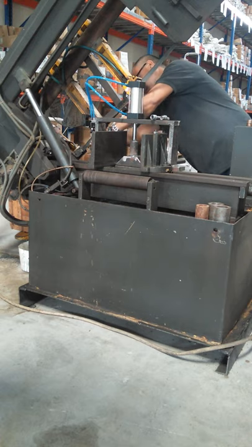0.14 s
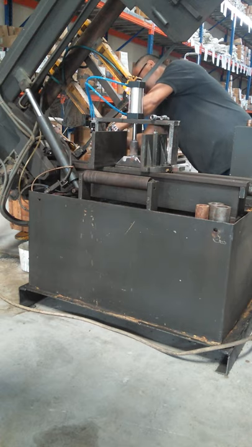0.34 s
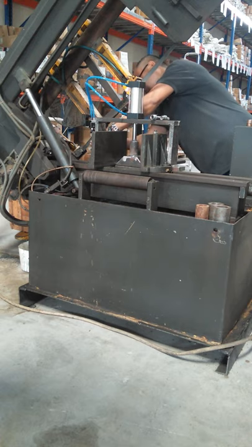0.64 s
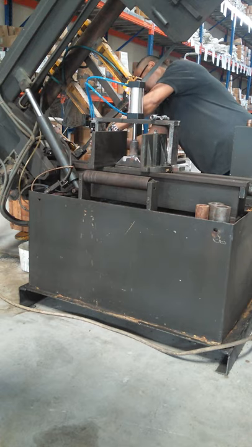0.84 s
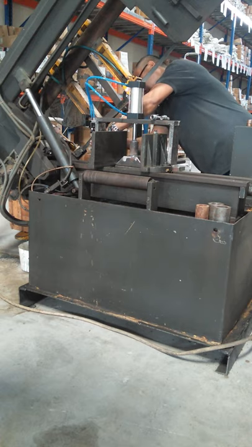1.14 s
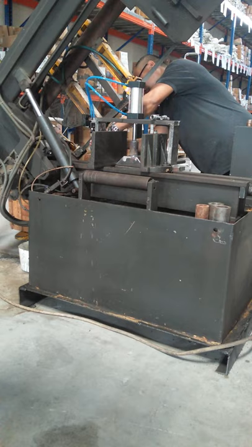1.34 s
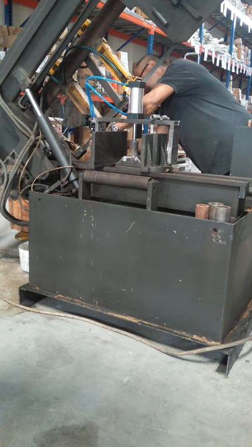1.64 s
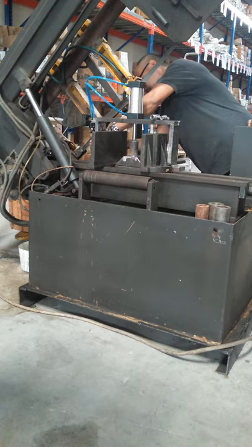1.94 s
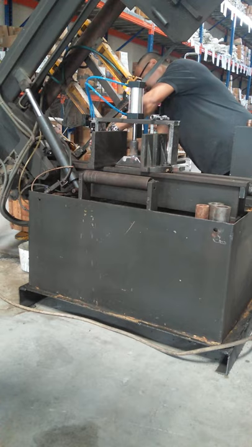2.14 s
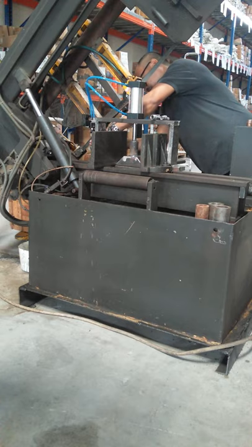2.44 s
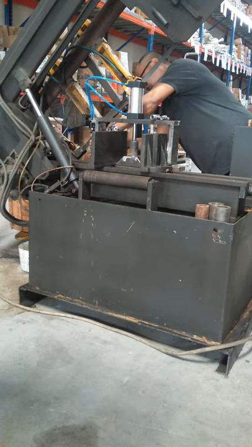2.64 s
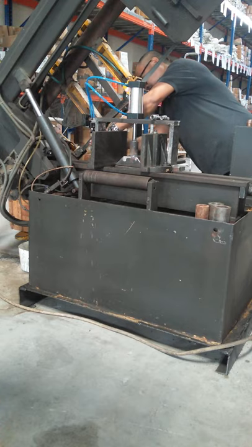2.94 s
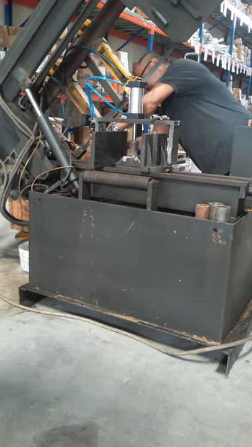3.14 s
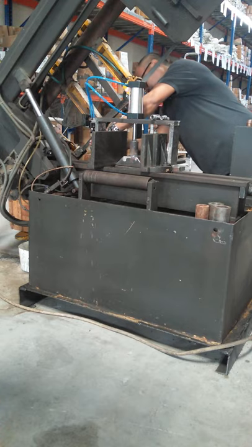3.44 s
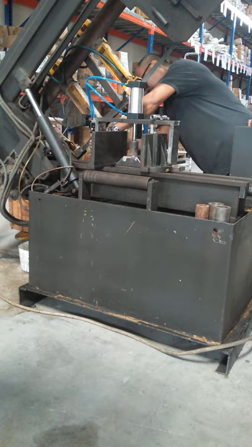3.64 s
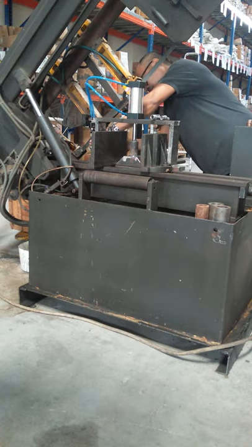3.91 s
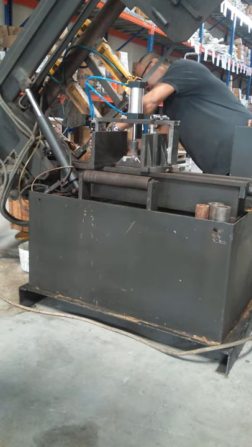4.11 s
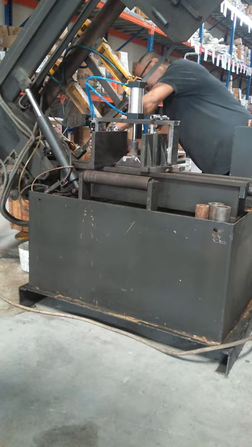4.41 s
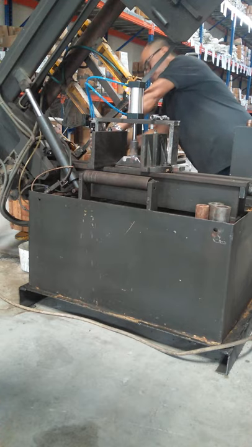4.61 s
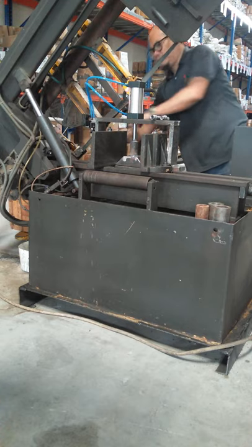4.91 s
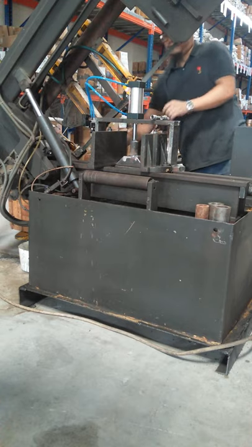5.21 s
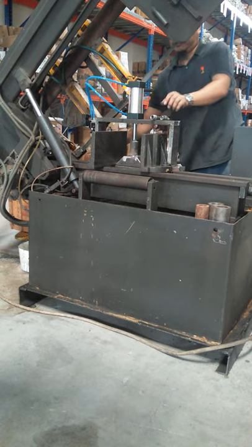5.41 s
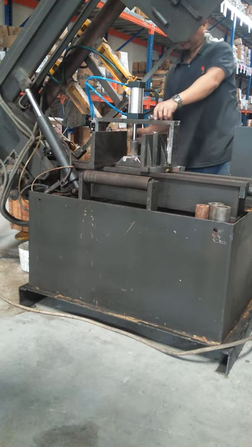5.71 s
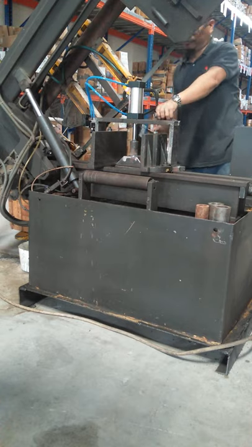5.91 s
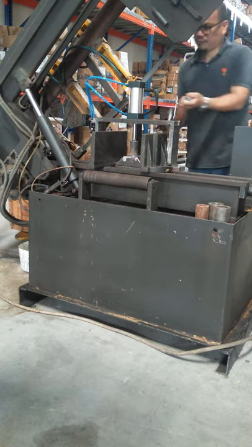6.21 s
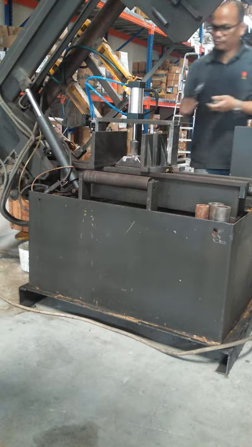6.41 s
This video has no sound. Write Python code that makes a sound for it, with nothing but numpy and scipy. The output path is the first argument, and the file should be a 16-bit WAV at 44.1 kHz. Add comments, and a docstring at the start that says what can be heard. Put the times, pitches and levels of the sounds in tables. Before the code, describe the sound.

In a big reverberant workshop, a threaded part squeaks under short hand strokes, a pneumatic cylinder vents a sharp fading hiss, then steel clinks.

```python
"""In a large workshop hall, a steel machine's pneumatic cylinder vents: shaped noise follows the falling
pressure. Its frame groans and thuds briefly: a wavering sine and bursts of low noise. A threaded part is turned
by hand in short strokes: noise scrapes and ticks, and a gliding tone squeaks. Loose steel clinks as blurred
decaying modes, and a second contact on the thread squeals drily on single lower notes. Behind lie a dying
distant bang, murmur, swells of far work and faint motor hum: decaying or steady noise and sines."""
import sys
import numpy as np
from scipy import signal
from scipy.fft import rfft, irfft, next_fast_len
from scipy.io import wavfile
from scipy.ndimage import map_coordinates

SR = 44100
rng = np.random.default_rng(int(sys.argv[2]) if len(sys.argv) > 2 else 0)


def unload_wav(signal):
    """Save mono or channel-first audio to the path in sys.argv[1] as 16-bit WAV at rate SR, clipped to [-1, 1]."""
    wavfile.write(
        sys.argv[1],
        SR,
        np.round(np.clip(np.atleast_2d(signal).T, -1, 1) * 32767).astype(np.int16),
    )


N = 288940  # samples


def amp(db):
    """Level to amplitude: 20 dB is a factor of ten."""
    return 10 ** (np.asarray(db) / 20)


def unit(x):
    """Normalisation to a root-mean-square value of 1."""
    return x / np.sqrt(np.mean(x ** 2) + 1e-20)


def along(points, hz):
    """Interpolation of (frequency_hz, value) points on a logarithmic frequency axis."""
    frequency, value = np.transpose(points)
    return np.interp(np.log(hz + 1), np.log(frequency), value)


def wobble(rate, size=N):
    """Slow random modulation: a smooth curve through normal random knots, rate knots a second."""
    knots = rng.standard_normal(int(size * rate / SR) + 4)
    return map_coordinates(knots, [np.arange(size) * rate / SR])


def filtered(x, response):
    """Linear filtering: the spectrum of x times a response given as a function of frequency."""
    m = next_fast_len(x.shape[-1] + SR // 4)  # zero padding limits wrap-around
    spectrum = rfft(x, m) * response(np.fft.rfftfreq(m, 1 / SR))
    return irfft(spectrum, m)[..., :x.shape[-1]]


# Coherence of the diffuse field: frequency_hz, left_right_likeness (0 to 1)
LIKENESS = [(100, 0.89), (250, 0.85), (500, 0.84), (1000, 0.14), (2000, 0)]


def spread(pair):
    """Diffuse-field coherence: two unrelated signals become alike in the bass, unrelated above."""
    def mid_side_gains(hz):
        angle = np.arccos(np.clip(along(LIKENESS, hz), -1, 1)) / 2
        return np.array([np.cos(angle), np.sin(angle)])

    mid, side = filtered(pair, mid_side_gains)
    return np.array([mid + side, mid - side])


def noise(spectrum, peaks=()):
    """Resonant filtering of random noise: stereo, rms 1, peaks standing on a broad spectrum."""
    def response(hz):
        lift = 1 + sum(amp(db) / (1 + (2 * (hz - centre) / width) ** 2) for centre, width, db in peaks)
        return amp(along(spectrum, hz)) * lift

    return unit(filtered(spread(rng.standard_normal((2, N))), response))


def decay(t, t60):
    """Exponential damping: the level falls 60 dB in t60 seconds."""
    return np.exp(-np.log(1000) * t / t60)


def gate(start, end, attack, t60):
    """Attack, hold and release: a linear rise from start, a hold until end, then exponential decay."""
    t = np.arange(N) / SR
    return np.clip((t - start) / attack, 0, 1) * decay(np.maximum(t - end, 0), t60)


def add(track, s, sound):
    """Superposition: a sound is summed into a track from time s."""
    part = track[..., round(s * SR):][..., :sound.shape[-1]]
    part += sound[..., :part.shape[-1]]


def die_away(x, t60s):
    """Frequency-dependent damping: every band of x decays at its own rate."""
    hz, t, bands = signal.stft(x, SR, nperseg=256)
    damped = bands * decay(t, along(t60s, hz)[:, None])
    return signal.istft(damped, SR, nperseg=256)[1][:, :x.shape[-1]]


# Faint steady hiss, spectral shape: frequency_hz, relative_level_db (per Hz)
HISS = [(300, -38), (1500, -6), (3000, -6), (6000, -14.5), (10000, -12), (15500, -10.5)]


def hiss(level_db=-63):
    """Stationary noise: a faint hiss of constant level lies on both sides."""
    return amp(level_db) * noise(HISS)


# Hall murmur, spectral shape: frequency_hz, relative_level_db (per Hz)
MURMUR_SPECTRUM = [(15, -60), (25, -26), (75, -2.5), (161, -4), (195, -7), (398, -11.5), (516, -10),
                   (731, -18.5), (840, -14.5), (983, -23), (1600, -20.5), (2080, -51), (3520, -120)]


def murmur(level_db=-54.0):
    """Stationary noise: broad low-pitched sound fills the hall with slight unsteadiness of level."""
    return amp(level_db + 1.1 * wobble(5)) * noise(MURMUR_SPECTRUM)


# Motor tones: pitch_hz (centre), relative_level_db (centre, before hum's offset)
MOTORS = [(75.4, -67.5), (344.5, -66.5), (716, -67), (1432, -73.5)]


def hum(offset_db=-1):
    """Periodic vibration: each motor sounds one sine of slightly wandering pitch and level."""
    total = 0
    for hz, db in MOTORS:
        level = amp(db + wobble(3.55))
        phase = 2 * np.pi * np.cumsum(hz + wobble(6)) / SR
        total = total + level * unit(np.sin(phase))
    return amp(offset_db) * total


# Swells of far work: peak_s, level_db
FAR_SWELLS = [(0, -42), (1.25, -56), (2.95, -50.5), (3.65, -51), (4.3, -48.5), (4.53, -48.5), (5.15, -51),
              (5.72, -47)]
# Far work, spectral shape: frequency_hz, relative_level_db (per Hz)
FAR_SPECTRUM = [(100, -11), (350, 0.5), (650, -2), (1000, -3), (1500, -7.5), (2500, -14), (5000, -23.5)]
# Far work, resonances: frequency_hz, width_hz, relative_level_db
FAR_RESONANCES = [(386, 81, -6.5), (857, 31, 1), (1010, 67, 2)]


def far_work(rise_s=0.15, t60=2.74):
    """Reverberant build-up and decay: each swell grows exponentially, then fades in the hall."""
    t = np.arange(N) / SR
    swells = []
    for peak_s, db in FAR_SWELLS:
        build_up = np.exp(np.minimum(t - peak_s, 0) / rise_s)
        swells.append(amp(db) * build_up * decay(np.maximum(t - peak_s, 0), t60))
    # unrelated swells sum in energy
    return np.linalg.norm(swells, axis=0) * noise(FAR_SPECTRUM, FAR_RESONANCES)


# Distant bang, spectral shape: frequency_hz, relative_level_db (per Hz)
BANG_SPECTRUM = [(40, -25), (80, -17), (160, -10), (300, -13.5), (500, -8), (750, -5), (1000, -8),
                 (1400, -8.5), (2100, -15.5), (4500, -21), (9000, -26), (15000, -45)]
# Distant bang, resonances: frequency_hz, width_hz, relative_level_db
BANG_RESONANCES = [(777, 27, 7.5), (1262, 43, 10), (1680, 27, 2), (2177, 33, 7)]
# Reverberation of the hall, also used by room(): frequency_hz, t60_s
HALL_T60 = [(100, 4.75), (1000, 2.1), (4000, 2.5), (7600, 1.31), (11000, 0.83), (16000, 0.4)]


def distant_bang(level_db=-33):
    """Reverberant decay: only the hall's ringing tail is left of a bang far away."""
    return amp(level_db) * die_away(noise(BANG_SPECTRUM, BANG_RESONANCES), HALL_T60)


def room(x, near_db=-5, near_t60=0.39, hall_db=-6):
    """Reverberation by convolution: nearby steel surfaces answer quickly, the big hall slowly."""
    near = die_away(rng.standard_normal((2, 2 * SR)), [(1000, near_t60)])
    hall = die_away(rng.standard_normal((2, 2 * SR)), HALL_T60)
    near = amp(near_db) * near / np.linalg.norm(near[0])
    hall = amp(hall_db) * hall / np.linalg.norm(hall[0])
    delayed = np.pad(spread(near + hall), ((0, 0), (SR // 200, 0)))  # begins 5 ms after the direct sound
    return x + signal.fftconvolve(x, delayed, axes=1)[:, :N]


# Dull pushes on the frame: start_s, level_db, t60_s
PUSHES = [(1.53, -38.5, 0.2), (1.95, -47.5, 0.65), (5.431, -62, .25)]
# Frame thud, spectral shape: frequency_hz, relative_level_db (per Hz)
FRAME_SPECTRUM = [(30, -17), (55, 2.5), (110, -1), (250, -9), (500, -40), (1500, -80)]


def jolts():
    """Impulsive excitation of a heavy body: the frame thuds in low noise when loaded or struck."""
    push, t = np.zeros(N), np.arange(SR // 2) / SR
    for s, db, t60 in PUSHES:
        add(push, s, amp(db) * np.minimum(t / 0.0046, 1) * decay(t, t60))
    return push * noise(FRAME_SPECTRUM)


# The frame under load: start_s, length_s, level_db (sine amplitude, before random variation)
FRAME_LOADS = [(1.878, 0.12, -38), (2.138, 0.063, -46.5)]


def groan(pitch_hz=162, waver_hz=4, attack=0.034, t60=0.27):
    """Forced vibration: the moving piston sets the frame humming unevenly on one wavering sine."""
    load = sum(amp(db) * gate(s, s + length, attack, t60) for s, length, db in FRAME_LOADS)
    unevenness = amp(1.5 * wobble(24.1))
    phase = 2 * np.pi * np.cumsum(pitch_hz + waver_hz * wobble(29.8)) / SR
    return load * unevenness * np.sin(phase)


# A second contact on the thread squeals drily at a lower note: start_s, pitch_hz (centre), level_db, t60_s
SECOND_CONTACT_SQUEALS = [(1.075, 4920, -67.5, 0.87), (5.708, 4680, -33.5, 0.13), (5.786, 4680, -43.5, 0.35),
                          (6.217, 4680, -55, 0.42)]


def pings(waver_hz=35):
    """Stick-slip at a second contact: each squeal rings briefly on one buzzing, damped note."""
    ring, t = np.zeros(N), np.arange(SR // 2) / SR
    for s, hz, db, t60 in SECOND_CONTACT_SQUEALS:
        pitch = hz + waver_hz * wobble(425, size=len(t))
        note = np.sin(2 * np.pi * np.cumsum(pitch) / SR)
        add(ring, s, amp(db) * np.minimum(t / 0.0022, 1) * decay(t, t60) * note)
    return ring


# Steel on steel: start_s, level_db (of the chatter), clatter_t60_s
CONTACTS = [(5.048, -34.5, 0.068), (5.429, -31.5, 0.077), (5.435, -26.5, 0.039), (5.443, -52, 0.035),
            (5.68, -46, 0.2)]
# Modes of the loose steel: pitch_hz (centre), relative_level_db (mean), t60_s
STEEL_MODES = [(1350, -21, 0.61), (2110, -16, 0.16), (2600, -30, 0.09), (3020, -13.5, 0.19),
               (4200, -29, 0.16), (4560, -24, 0.15), (5060, -11.5, 0.2), (5660, -24, 0.13),
               (7230, -6.5, 0.087), (7980, -1.5, 0.13), (11600, -7.5, 0.068)]
# Contact chatter, spectral shape: frequency_hz, relative_level_db (per Hz)
CLATTER_SPECTRUM = [(150, 3.5), (700, -2), (1400, -3.5), (2400, 5), (3500, -5), (4800, 6.5), (6500, -6.5),
                    (9000, -10), (12000, -11), (16000, -42.5)]


def clinks(ring_db=-2.5, attack=0.00071, rattle=0.014):
    """Modal synthesis: loose steel chatters and rings on; the rattling contact blurs its modes."""
    ring, chatter, t = np.zeros(N), np.zeros(N), np.arange(SR // 4) / SR
    rise = 1 - np.exp(-t / attack)
    for s, db, clatter_t60 in CONTACTS:
        for hz, mode_db, t60 in STEEL_MODES:
            pitch = hz * (1 + rattle * wobble(470, size=len(t)))
            cycles = rng.random() + np.cumsum(pitch) / SR
            level = amp(db + ring_db + mode_db + rng.standard_normal())  # modes vary from hit to hit
            add(ring, s, level * rise * decay(t, t60) * np.sin(2 * np.pi * cycles))
        add(chatter, s, amp(db) * rise * decay(t, clatter_t60))
    return ring + chatter * noise(CLATTER_SPECTRUM)


# The thread catching: start_s, relative_level_db (before the offset in ticks)
CATCHES = [(0.7334, -40.5), (3.472, -34), (3.5054, -36.5), (3.95, -38), (4.2532, -49), (4.2898, -34),
           (4.785, -32), (5.188, -30), (5.227, -30.5), (5.392, -37.5), (6.0122, -34), (6.0467, -30)]
# Rubbing thread, spectral shape, also used by squeaks(): frequency_hz, relative_level_db (per Hz)
SCRAPE_SPECTRUM = [(1000, -8.5), (2500, -9), (4500, -2), (6400, -7.5), (7800, 10.5), (9500, -2.5),
                   (12500, -5), (16000, -9.5)]


def ticks(offset_db=4, t60=0.019):
    """Sudden release: the thread catches with tiny dry snaps of fast-decaying noise."""
    snaps, t = np.zeros(N), np.arange(SR // 8) / SR
    for s, db in CATCHES:
        add(snaps, s, amp(db + offset_db) * np.minimum(t / 0.00099, 1) * decay(t, t60))
    return snaps * noise(SCRAPE_SPECTRUM)


# Strokes of the thread, levels before fade and decay:
# start_s, length_s, squeal_lock_s, squeal_pitch_hz (mid-stroke), squeal_level_db, scrape_level_db
STROKES = [(0.074, 0.13, .02, 7700, -69, -48.5), (0.299, 0.15, 0.016, 7660, -37.5, -44.5),
           (0.458, 0.092, 0.036, 7653, -35, -50), (0.732, .07, 0.0032, 7660, -40, -59.5),
           (1.138, 0.067, 0.0027, 7550, -50.5, -63.5), (1.459, 0.1, 0.019, 7690, -42, -41),
           (2.585, .13, 0.019, 7705, -34, -43.5), (2.68, 0.12, 0.0064, 7477, -36.5, -54),
           (3.448, 0.051, .02, 7580, -38.5, -48.5), (3.511, 0.041, 0.0035, 7620, -29.5, -45.5),
           (3.579, 0.04, 0.0046, 7510, -35.5, -51), (3.934, 0.094, 0.028, 7660, -44.5, -48.5),
           (4.236, 0.12, 0.021, 7630, -36, -43), (4.418, 0.162, 0.012, 7590, -42, -52.5),
           (4.774, .11, 0.014, 7606, -41.5, -47), (5.18, 0.177, 0.02, 7680, -31, -42.5),
           (5.779, 0.05, 0.013, 7660, -46.5, -81), (6.018, .15, 0.013, 7650, -41, -45)]
# Partials of the squeal: ratio to its pitch, relative_level_db
SQUEAL_PARTIALS = [(.489, -24.5), (1, 5.5), (1.519, -29)]


def squeaks(waver_hz=22, flutter_db=3.5, edge=0.0055, glide_hz=40, fade_db_per_s=17, scrape_t60=0.77):
    """Stick-slip friction: each stroke scrapes as it breaks loose and locks onto one unsteady high note."""
    squeal, rubbing = np.zeros(N), np.zeros(N)
    t = np.arange(SR // 3) / SR
    for s, length, lock, hz, db, scrape_db in STROKES:
        grip = np.clip(t / 0.0025, 0, 1) * np.clip((length - t) / edge + .5, 0, 1)
        # the note sags a little as the stroke slows
        pitch = hz + glide_hz * (.5 - t / length) + waver_hz * wobble(227, size=len(t))
        phase = 2 * np.pi * np.cumsum(pitch) / SR
        flutter = amp(flutter_db * wobble(103.4, size=len(t)))
        tone = unit(sum(amp(d) * np.sin(ratio * phase) for ratio, d in SQUEAL_PARTIALS) * flutter)
        # the squeal locks on, then fades as the hand slows
        level = amp(db - fade_db_per_s * t) * np.minimum(t / lock, 1) ** 2
        add(squeal, s, level * grip * tone)
        add(rubbing, s, amp(scrape_db) * grip * decay(t, scrape_t60))
    roughness = unit(amp(1.8 * wobble(300)))
    return squeal + rubbing * roughness * noise(SCRAPE_SPECTRUM)


# Exhaust jet, spectral shape: frequency_hz, relative_level_db (per Hz)
JET_SPECTRUM = [(35, -31), (60, -10), (124, -26), (160, -18), (198, -16), (294, -11), (354, -8), (527, -8),
                (636, -4), (2650, -2), (4640, 1.5), (6430, -0.5), (8320, 0), (14900, -8), (16000, -12)]
# Resonances of the exhaust port: frequency_hz, width_hz, relative_level_db
PORT_RESONANCES = [(1350, 860, -7), (3400, 660, -16), (5000, 440, -14), (8420, 1000, -3)]
# Surges that ring the exhaust port: start_s, level_db (before flicker)
PORT_SURGES = [(1.53, -20.5), (1.664, -26)]
# Surges, spectral shape: frequency_hz, relative_level_db (per Hz)
SURGE_SPECTRUM = [(300, -25.5), (1000, -13), (2500, -13), (4000, 2.5), (5300, 0), (6500, -5), (8300, -2.5),
                  (15000, -11)]
CRACK_S, OPEN_S, SHUT_S = 1.506, 1.531, 2.15  # the valve cracks, opens fully and shuts
# flow at first, and once the pressure has fallen to that of the supply; time constant of the fall
BURST_DB, SUPPLY_DB, DRAIN_S = -20.5, -28.5, 0.31


def exhaust(split_hz=900, rumble_give=0.63, attack=0.0023, shut_t60=0.49,
            surge_s=0.048, surge_t60=0.19, puff_db=-36, puff_hz=1800):
    """Turbulent jet noise: a dull puff, then the full jet, whose hiss weakens faster than its rumble."""
    jet = noise(JET_SPECTRUM, PORT_RESONANCES)
    age = np.maximum(np.arange(N) / SR - OPEN_S, 0)
    flow = amp(SUPPLY_DB) + (amp(BURST_DB) - amp(SUPPLY_DB)) * np.exp(-age / DRAIN_S)

    def below(corner):
        return filtered(jet, lambda hz: 1 / (1 + (hz / corner) ** 4))

    rumble = below(split_hz)
    middle = amp((BURST_DB + SUPPLY_DB) / 2)
    rumble_flow = middle * (flow / middle) ** rumble_give  # a power below 1 softens the fall
    blast = gate(OPEN_S, SHUT_S, attack, shut_t60) * (flow * (jet - rumble) + rumble_flow * rumble)
    puff = amp(puff_db) * gate(CRACK_S, OPEN_S, attack, shut_t60) * below(puff_hz)
    surge_level = sum(amp(db) * gate(s, s + surge_s, attack, surge_t60) for s, db in PORT_SURGES)
    flicker = amp(0.65 * wobble(40.42))
    return flicker * (blast + puff + surge_level * noise(SURGE_SPECTRUM))


# Stereo balance: frequency_hz, left_minus_right_db
BALANCE = [(60, -0.5), (110, 0.5), (200, 1), (380, -1.5), (700, -4), (1290, -3.5), (2380, 4.5), (4400, 16),
           (8120, 32.5), (15000, 10.5)]


def scene(ping_room_db=-9):
    """Superposition and level difference: all but the hiss leans left in the treble."""
    ping = pings()
    machine = exhaust() + squeaks() + ticks() + clinks()
    sound = room(machine + amp(ping_room_db) * ping)  # the pings excite the room only weakly
    sound = sound + ping + groan() + jolts()
    sound = sound + distant_bang() + murmur() + hum() + far_work()

    def sides(hz):
        lean = along(BALANCE, hz)
        return 2 / (1 + amp(np.array([-lean, lean])))

    return filtered(sound, sides) + hiss()


def record(dry, top_hz=15950):
    """Band limitation: nothing is kept at or above top_hz."""
    return filtered(dry, lambda hz: hz < top_hz)


dry = scene()
out = record(dry)
unload_wav(out)
```